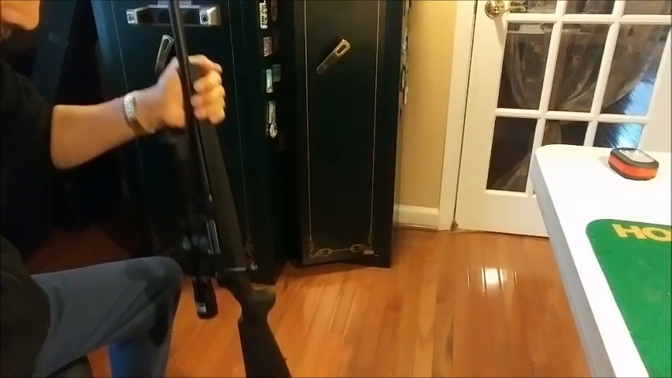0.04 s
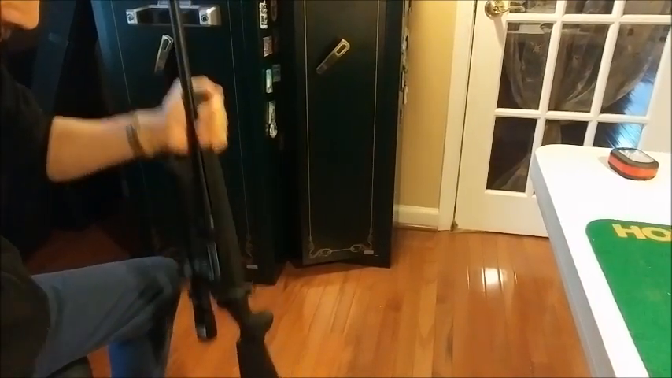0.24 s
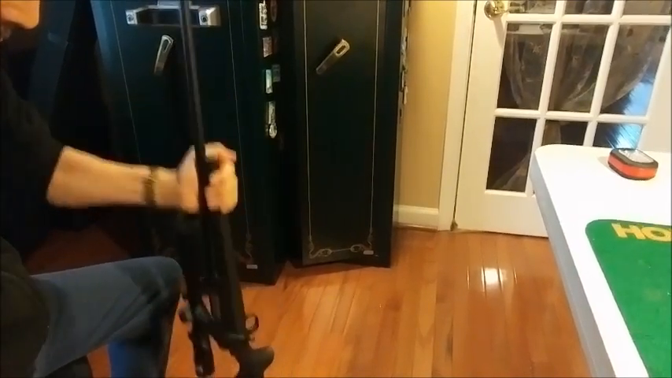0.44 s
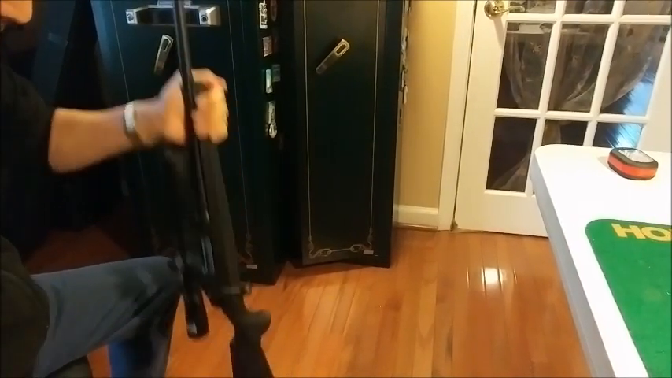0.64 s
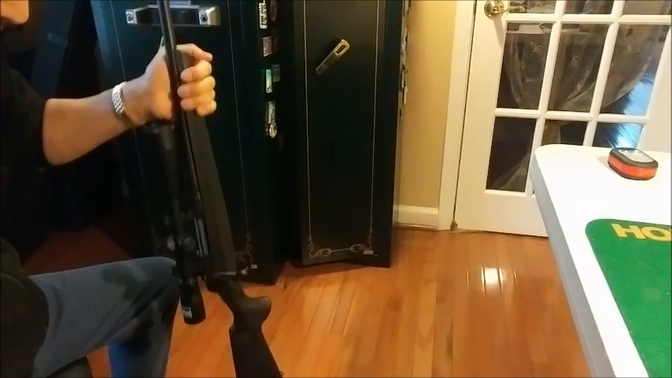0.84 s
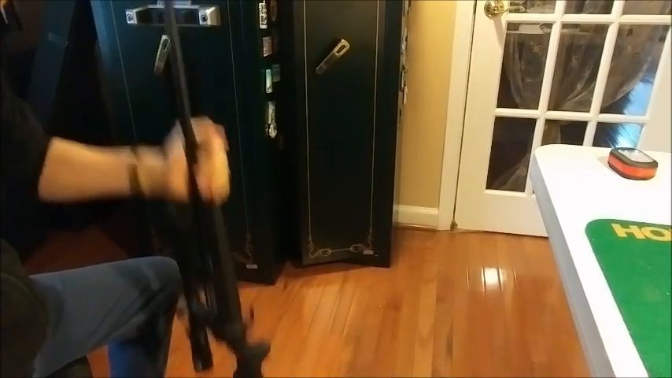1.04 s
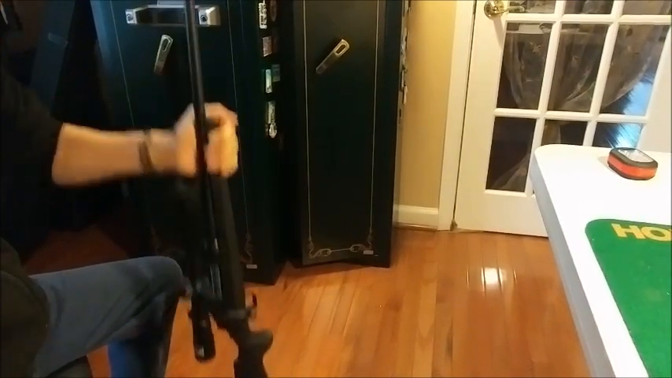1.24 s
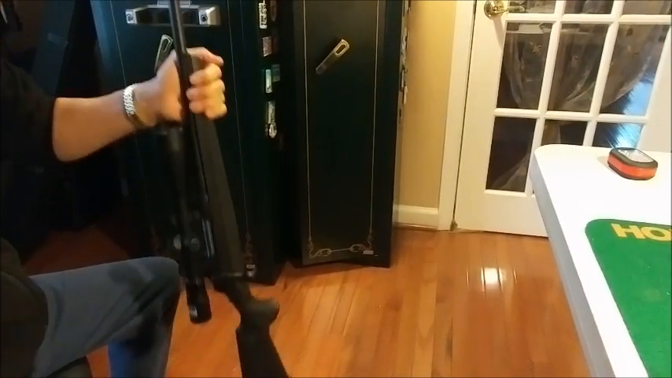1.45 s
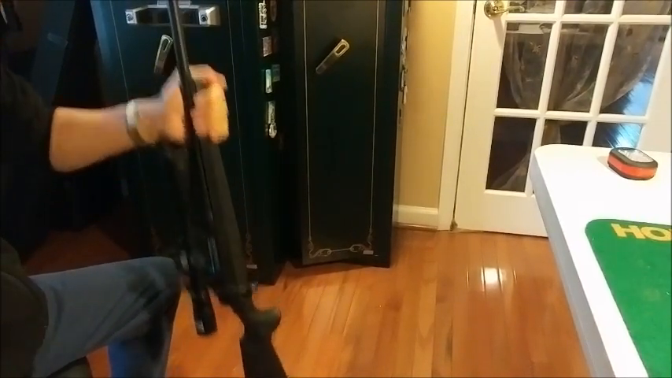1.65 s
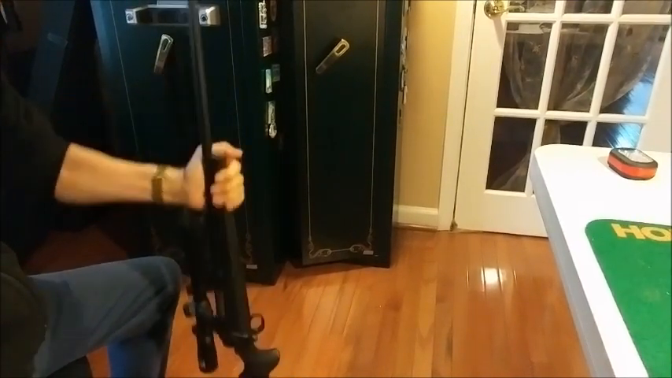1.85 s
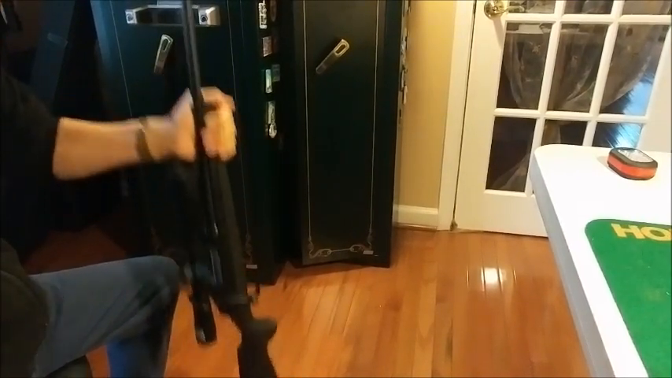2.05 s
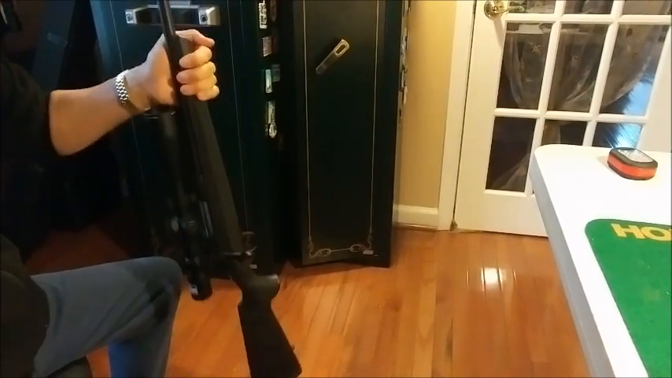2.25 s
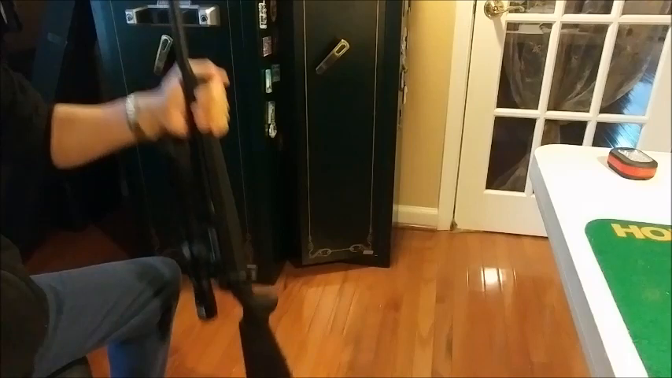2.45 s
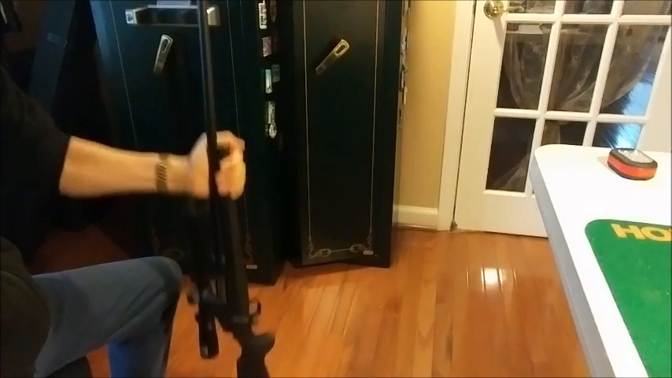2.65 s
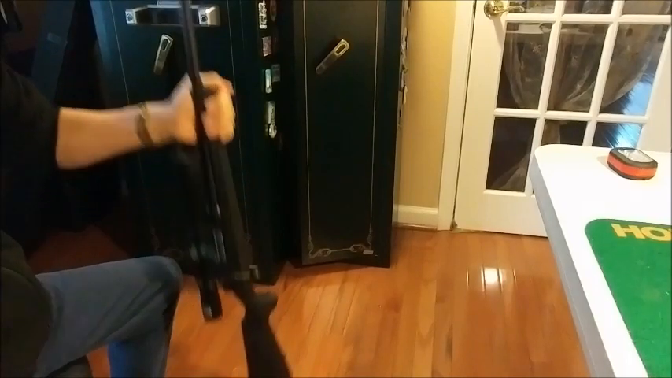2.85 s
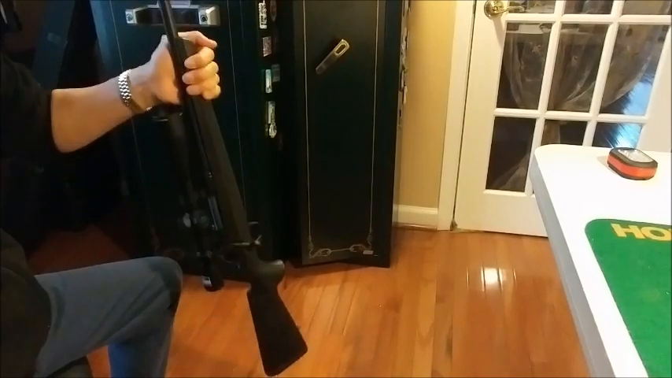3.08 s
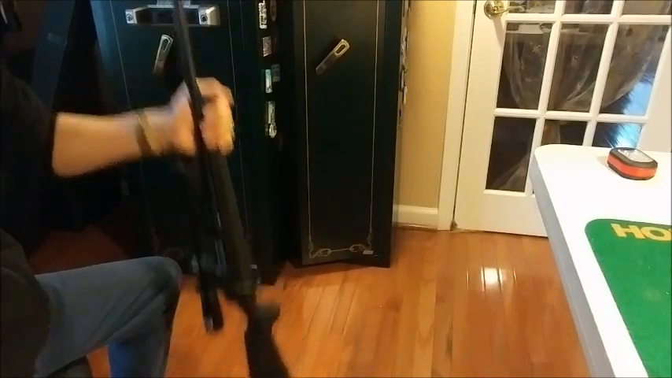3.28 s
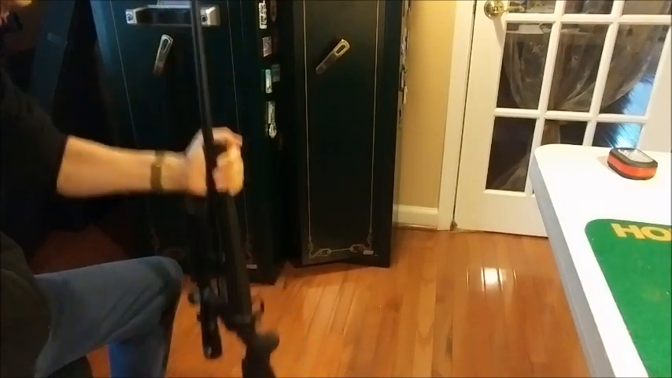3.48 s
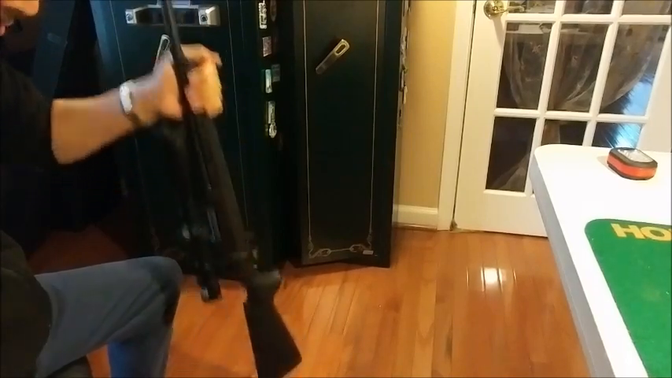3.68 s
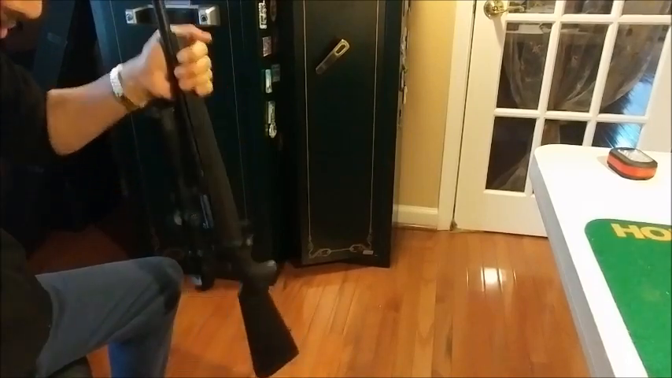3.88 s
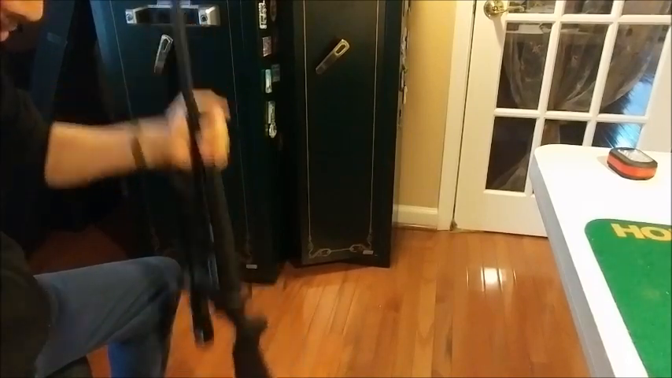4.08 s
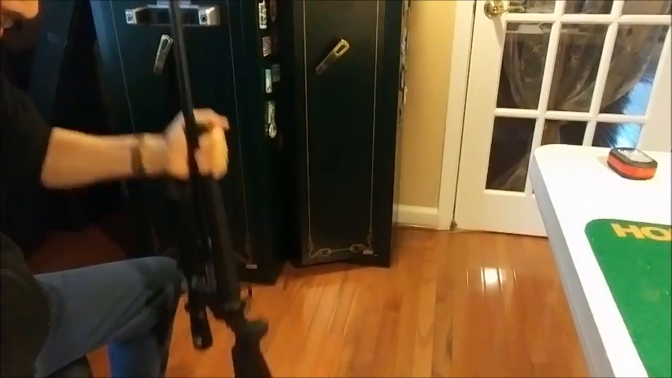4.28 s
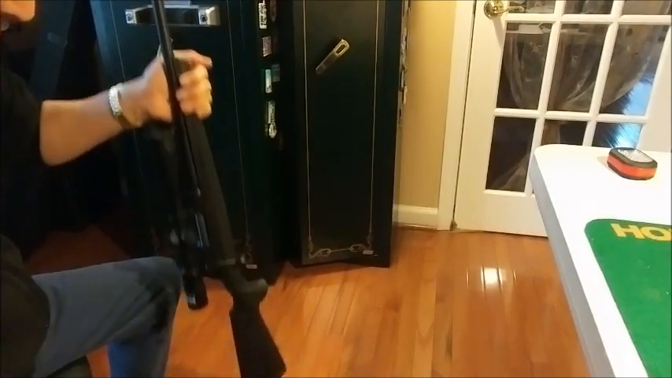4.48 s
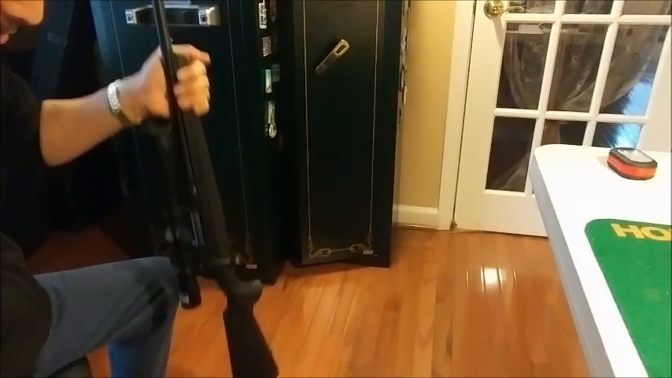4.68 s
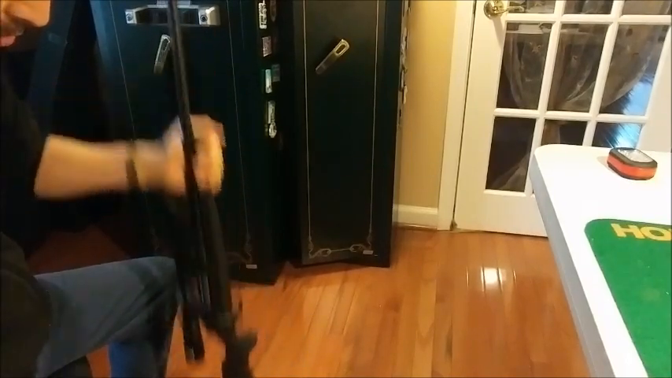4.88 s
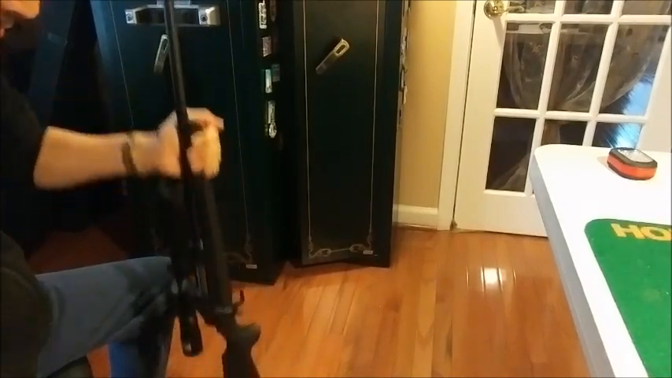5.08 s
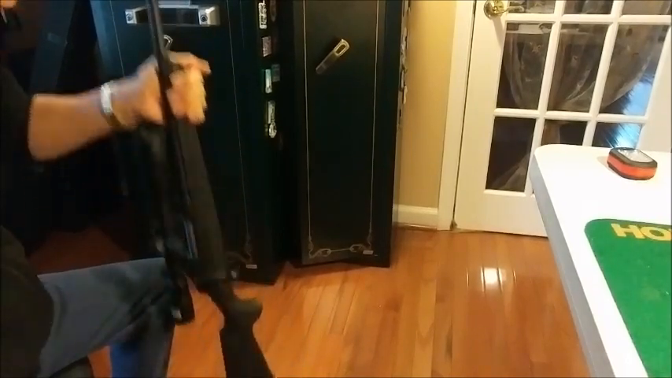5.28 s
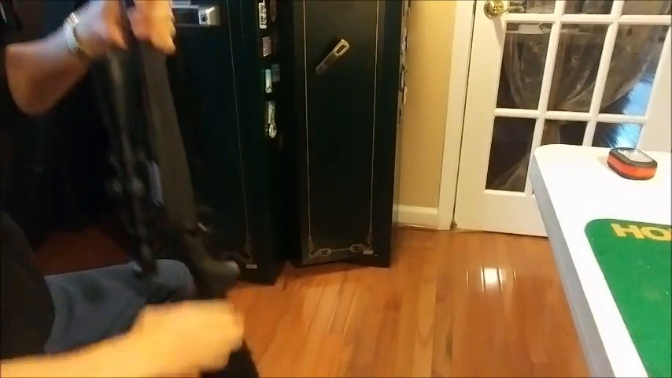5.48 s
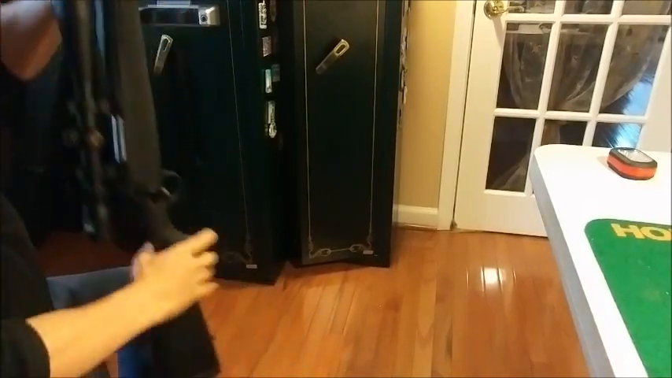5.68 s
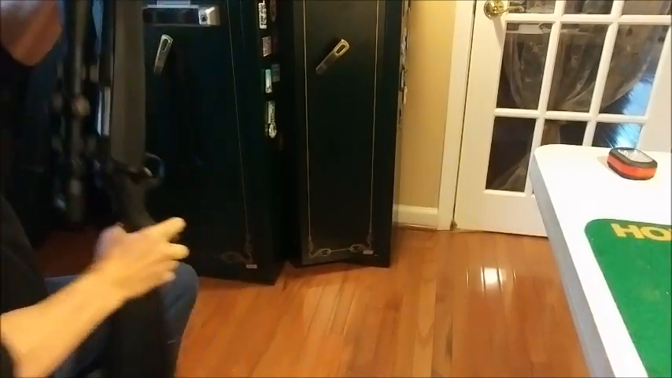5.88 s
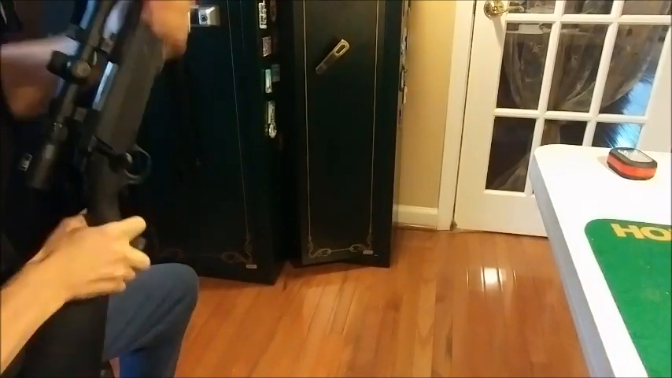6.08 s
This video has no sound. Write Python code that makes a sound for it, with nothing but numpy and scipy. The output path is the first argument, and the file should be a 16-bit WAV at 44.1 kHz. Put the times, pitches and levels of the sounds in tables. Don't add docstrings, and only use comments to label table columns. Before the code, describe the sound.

Seven heavy, evenly spaced floor thumps shake loose metal cabinets into buzzing rattle and ringing, followed by soft hand strokes and a small latch click.

```python
import sys
import numpy as np
from scipy import signal
from scipy.fft import rfft, irfft, next_fast_len
from scipy.io import wavfile
from scipy.ndimage import uniform_filter1d, minimum_filter1d

SR = 44100
rng = np.random.default_rng(int(sys.argv[2]) if len(sys.argv) > 2 else 0)


def master_out(mix):
    frames = np.transpose(np.atleast_2d(mix))
    ceiling = np.clip(frames, -1, 1)
    pcm = np.round(ceiling * 32767).astype(np.int16)
    wavfile.write(sys.argv[1], SR, pcm)


def boost_factor(decibels):
    exponent = np.asarray(decibels, float) / 20
    return 10 ** exponent


N = 270200
LEAD = SR // 2
M = next_fast_len(N + LEAD)


def unit(x):
    return x / np.sqrt(np.mean(x ** 2))


def on_log(hz, table):
    f, v = np.transpose(table)
    return np.interp(np.log(np.maximum(hz, 1)), np.log(f), v)


def colour(x, table):
    n = x.shape[-1]
    hz = np.arange(n // 2 + 1) * SR / n
    return irfft(rfft(x) * boost_factor(on_log(hz, table)), n)


def ring(modes, seconds):
    t = np.arange(int(seconds * SR)) / SR
    return sum(sign * boost_factor(db) * np.sin(2 * np.pi * hz * t) * boost_factor(-60 * t / t60)
               for hz, db, t60, sign in modes)


def body(x, peaks):
    total = 0
    for k, (hz, width, db) in enumerate(peaks):
        b, a = signal.iirpeak(hz, hz / width, fs=SR)
        total = total + (-1) ** k * boost_factor(db) * signal.lfilter(b, a, x)
    return total


def strike(shape, seconds, db):
    taps = np.zeros(M)
    taps[np.round(np.asarray(seconds) * SR).astype(int) + LEAD] = boost_factor(db)
    return signal.fftconvolve(taps, shape)[:M]


def chatter(seconds, db, rise_s, fall_s):
    t = np.arange(SR // 4) / SR
    envelope = np.exp(-t / fall_s) * np.clip(t / rise_s, 0, 1)
    return rng.standard_normal(M) * strike(envelope, seconds, db)


def room(x, gap_s=0.0029):
    # (f/Hz, t60/s)
    room_t60 = [(100, 0.73), (500, 0.41), (2000, 0.42), (8000, 0.17)]
    t = np.arange(SR) / SR
    tail = 0
    for hz in 62.5 * 2 ** np.arange(9):
        edges = [hz / 2 ** .5, min(hz * 2 ** .5, .45 * SR)]
        octave = signal.butter(2, edges, "band", fs=SR, output="sos")
        noise = signal.sosfilt(octave, rng.standard_normal((2, SR)))
        thin_db = on_log(hz, [(250, -6), (1000, 0)])
        tail = tail + noise * boost_factor(-60 * t / on_log(hz, room_t60) + thin_db)
    tail = tail * np.clip(t / gap_s, 0, 1)
    tail = tail / np.sqrt(np.sum(tail ** 2, axis=1, keepdims=True))
    return signal.fftconvolve(x[None], tail, axes=1)[:, :M]


def heard(x, wet_db, pan_db):
    x_dull = colour(x, [(3000, 0), (8000, -7)])
    direct = np.array([np.roll(x_dull, 3), x_dull])
    pan = boost_factor(np.array([[pan_db], [-pan_db]]) / 2)
    return (direct + boost_factor(wet_db) * room(x)) * pan


def hush():
    # (f/Hz, density/dB per Hz)
    hush_curve = [(25, -45), (40, -24), (55, -11), (100, -5), (140, -5), (194, -3), (342, -12), (450, -13),
                  (1470, -27), (4000, -33), (9000, -42), (15700, -40)]
    mid, side = colour(rng.standard_normal((2, M)), hush_curve)
    side = colour(side, [(60, -14.5), (300, -6.0), (1200, 1.0)])
    steps = np.repeat(rng.standard_normal(M // 3000 + 1), 3000)[:M]
    wander = uniform_filter1d(steps, 3000)
    bass = colour(mid, [(300, 0.), (900, -30.)]) * (boost_factor(3.5 * wander) - 1)
    both = mid + bass + side * np.array([[1], [-1]])
    return boost_factor(-62) * unit(both) * boost_factor(np.array([[1.8], [-1.8]]))


def strokes(t):
    # (loudest at t/s, level/dB, rise/s, hold/s)
    stroke_list = [
        (5.304, -49, .04, .06),
        (5.753, -66, .03, 0.013),
        (5.861, -62, 0.038, .005),
        (6.09, -48.5, .11, .005),
    ]
    rise_db, fall_db_s = 24, 262.5
    total = 0
    for s, db, rise, hold in stroke_list:
        swell = np.minimum(rise_db * (t - s) / rise, 0)
        release = fall_db_s * np.maximum(t - s - hold, 0)
        total = total + boost_factor(db + swell - release)
    return total


def hand():
    # (f/Hz, density/dB per Hz)
    skin = [(800, -16.5), (2000, -13.5), (4500, -10), (6300, -7.5), (7800, 1.5), (8900, -8.5),
            (10400, -35.5), (12500, -24), (15500, -26.5)]
    # (f/Hz, width/Hz, level/dB)
    latch = [(1320, 200, -5), (1700, 200, -3), (1840, 60, 4), (2050, 200, -12), (600, 200, -8),
             (1100, 150, -7)]
    latch_s, latch_db = 6.0905, -22
    t = (np.arange(M) - LEAD) / SR
    grains = rng.standard_normal(M) * boost_factor(2. * rng.exponential(size=M))
    slide = unit(colour(grains, skin)) * strokes(t)
    swivel = body(chatter([5.94], -42.0, 0.025, 0.087), [(1090.0, 16.0, 0)])
    snap = chatter([latch_s], latch_db, .0001, .001)
    snap = snap + chatter([latch_s], latch_db - 11, .0005, .014)
    return slide + swivel + body(snap, latch)


def clack():
    # (f/Hz, width/Hz, level/dB)
    frame_peaks = [(1000, 270, 0.5), (1444, 400, -2), (1863, 370, -2)]
    return body(chatter([5.0145], -1, 0.00028, .003), frame_peaks)


def shaking(t):
    peak_s, peak_db = .037, 2.5
    rise_db_s, fall_db_s = 504, 189
    stop_s, stop_db_s = .11, 252
    settle_db, settle_db_s = -7.5, 123
    late = t - peak_s
    swell = np.minimum(rise_db_s * late, -fall_db_s * late)
    doors = peak_db + swell - stop_db_s * np.maximum(t - stop_s, 0)
    return np.where(late > 0, np.maximum(doors, settle_db - settle_db_s * t), doors)


def cabinet(s, rattle_db, ring_db, tilt_db, swing):
    # (f/Hz, density/dB per Hz)
    rattle_curve = [(60, -13), (120, 8), (260, 0.5), (450, -1.5), (900, -9), (2000, -5), (3150, -4),
                    (4800, -6), (7700, -2), (8900, -12.5), (9700, -38.5), (10400, -57), (11300, -33.5),
                    (12500, -27), (15500, -31)]
    # (f/Hz, width/Hz, level/dB)
    steel_doors = [(998, 18, -0.5), (1043, 20, 2), (1100.3, 18, -2.5), (1206, 26, -9.5), (1636, 45, -8.5),
                   (1690, 70, -9.5), (1898, 58, -10), (2099, 20, -13), (3130, 160, -16)]
    t = np.arange(SR // 2) / SR
    shake = boost_factor(shaking(t))
    slams = .004 + np.arange(4) / 58.48
    shake = shake + sum(boost_factor(3 + shaking(at)) * np.exp(-np.maximum(t - at, 0) / 0.00032) * (t > at)
                        for at in slams)
    ticks = rng.standard_normal(M) * (rng.random(M) < .03) * boost_factor(3 * rng.exponential(size=M))
    ticks = ticks / np.sqrt(uniform_filter1d(ticks ** 2, 1500) + 1e-9) * boost_factor(2.5 * swing)

    hiss = unit(colour(ticks, rattle_curve))
    top = signal.sosfilt(signal.butter(2, 4500., "high", fs=SR, output="sos"), hiss)
    plain = strike(shake, s - .003, rattle_db)
    bright = strike(shake, s - .003, rattle_db + tilt_db)
    rattle = hiss * plain + top * (bright - plain)

    blow = np.searchsorted(s, (np.arange(M) - LEAD) / SR + .003).clip(1) - 1
    favour = boost_factor(3 * rng.standard_normal((len(s), len(steel_doors))))
    drive = ticks * strike(shake ** 1.5, s - .003, ring_db)
    doors = sum(body(drive * favour[blow, k], [door]) for k, door in enumerate(steel_doors))
    return np.array([boost_factor(-26.5) * rattle, boost_factor(-10.5) * doors])


def knock(s, db):
    # (f/Hz, width/Hz, level/dB)
    boards = [(247, 32, -3), (348, 49, -4.5), (384, 85, -0.5), (570, 47, 6.5), (687, 18, 5),
              (940, 220, -3.5), (2114, 1800, -26)]
    pad = chatter(s - .003, db, 0.0017, 0.052)
    tick = chatter(s - .003, db, 0.0005, 0.009)
    return boost_factor(-5.0) * body(pad + boost_factor(1.5) * tick, boards)


def boom(s, db):
    # (f/Hz, level/dB, t60/s, sign)
    joists = [(42.5, -22.1, 0.44, 1), (49.7, -14.2, 0.4, -1), (52.0, -40.0, 1.55, -1),
              (55.1, -10.6, 0.44, -1), (57.5, -5.2, 0.36, 1), (61.4, -26.0, 0.57, -1),
              (65.5, -21.9, 0.44, -1), (69.1, -16.5, 0.48, 1), (73.2, -17.9, 0.42, -1),
              (80.3, -22.7, 0.35, 1), (93.0, -13.8, 0.27, 1), (95.3, -7.9, 0.1, -1),
              (105.9, -13.5, 0.32, 1), (110.3, -15.2, 0.33, -1), (127.5, -27.8, 0.54, 1),
              (140.5, -34.6, 0.7, 1), (164.0, -11.6, 0.29, -1), (164.3, -8.5, 0.12, 1),
              (182.6, -22.2, 0.33, -1), (203.2, -30.2, 0.44, -1), (219.5, -35.7, 0.56, 1),
              (244.9, -34.4, 0.55, -1), (262.1, -28.1, 0.27, -1), (266.6, -27.5, 0.18, 1),
              (310.4, -42.4, 0.6, 1), (371.8, -54.7, 0.85, -1)]
    # (f/Hz, level/dB, t60/s, sign)
    room_modes = [(48.4, -44, 1.2, -1), (108, -48, 1.2, 1)]
    push = np.hanning(100)
    modes = ring([*joists, *room_modes], 1.2)
    return strike(np.convolve(modes, push / push.sum()), s - .0031, db)


def scene():
    # (t/s, boom level/dB, knock level/dB, rattle level/dB, steel ring level/dB)
    blows = [
        (-.28, 1.5, 6, 4, 4.5),
        (0.42, -1, -1.5, 1, 1.5),
        (1.1396, .5, -5, 3, 3),
        (1.8498, -0.5, -9.5, 3, 0),
        (2.6562, -2, -10, 0.5, -1),
        (3.442, -1, -4, -0.5, -3.5),
        (4.209, 1, -6, 3, 1.5),
        (4.9831, 0, -6, 3, 5),
    ]
    s, boom_db, knock_db, rattle_db, ring_db = np.transpose(blows)
    tilt_db = -1.5 + .6 * ring_db
    floor = boom(s, boom_db)
    swing = floor / (np.abs(signal.hilbert(floor)) + 1e-4)
    mix = np.array([np.roll(floor, 3) * boost_factor(2.9), floor * boost_factor(-.9)])
    mix = mix + heard(knock(s, knock_db), -7, 4.2)
    steel = np.array([cabinet(s, rattle_db, ring_db, tilt_db, swing) for _ in range(3)])
    mix = mix + sum(heard(rattle, 0.13, 5.4) for rattle in steel[:, 0])
    mix = mix + heard(steel[:, 1].sum(0) + clack(), -5.5, 8.4)
    mix = mix + heard(hand(), -4.3, 3.5) + hush()
    return mix[:, LEAD:LEAD + N]


def top_cut(x):
    return signal.sosfilt(signal.butter(12, 15880, fs=SR, output="sos"), x)


def record(dry):
    x = np.array([dry[0], signal.lfilter(*signal.butter(1, 20, "high", fs=SR), dry[1])])
    limit = np.minimum(1, .93 / (np.abs(x).max(0) + 1e-9))
    x = x * uniform_filter1d(minimum_filter1d(limit, 101), 51)
    port = [(2800, 0), (4500, -4), (6000, -3), (8000, 4), (11000, 0)]  # (f/Hz, gain/dB)
    x = np.array([x[0], colour(x[1], port)])
    hz = np.arange(N // 2 + 1) * SR / N
    spectrum = rfft(x) * (hz < 15700)
    x = irfft(spectrum, N)
    weak = irfft(spectrum * ((hz > 9450) & (hz < 11400)), N)
    treble = irfft(spectrum.mean(0) * ((hz > 5000) & (hz < 9000)), N)
    masked = uniform_filter1d(treble ** 2, 1024) > boost_factor(2 * -65)
    finished = x - weak * uniform_filter1d(1. * masked, 512)
    return top_cut(finished)


dry = scene()
out = record(dry)
master_out(out)
```